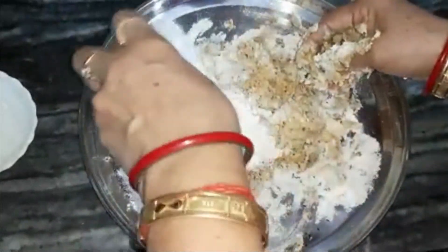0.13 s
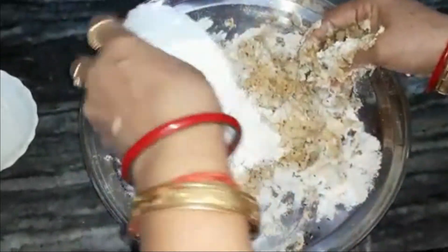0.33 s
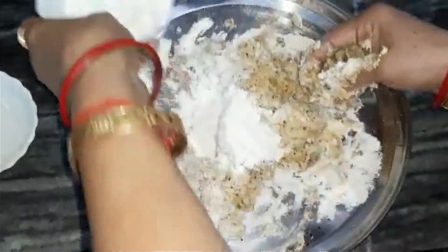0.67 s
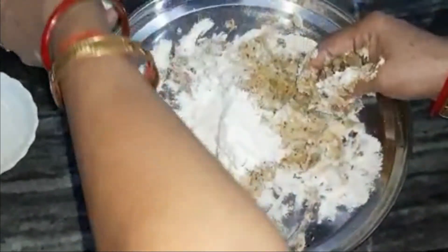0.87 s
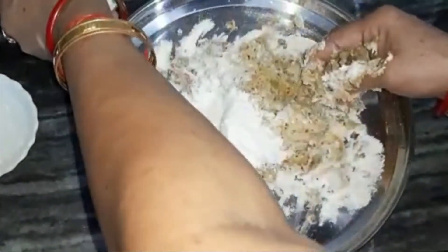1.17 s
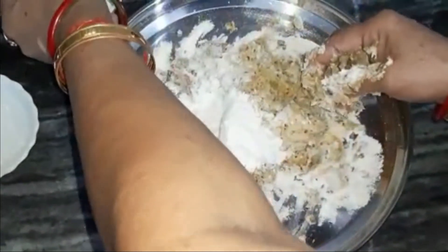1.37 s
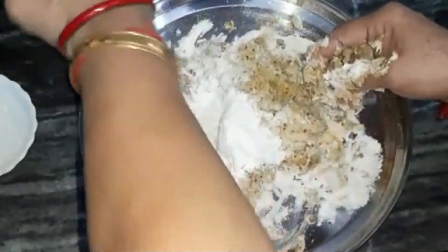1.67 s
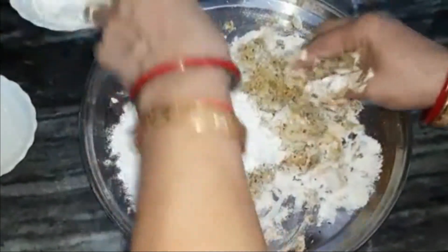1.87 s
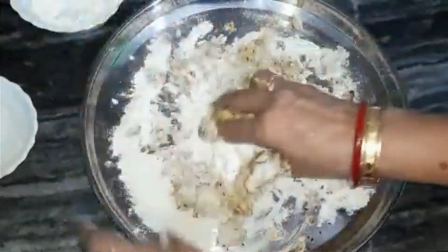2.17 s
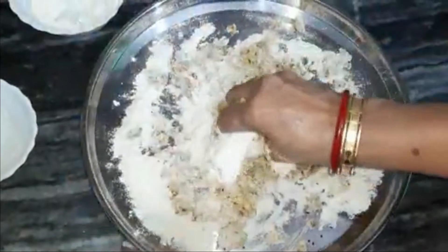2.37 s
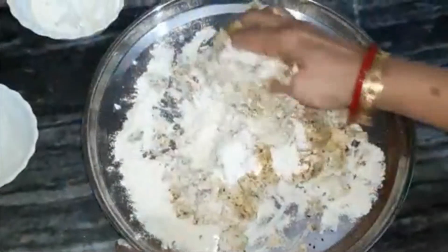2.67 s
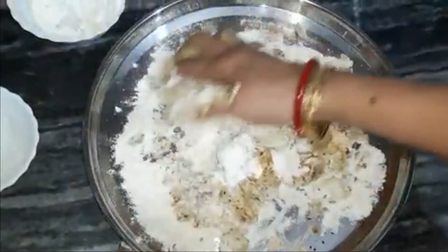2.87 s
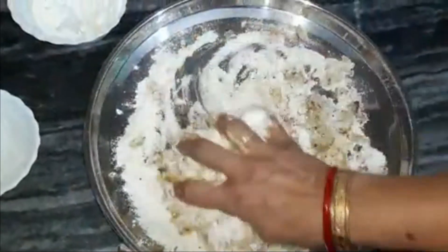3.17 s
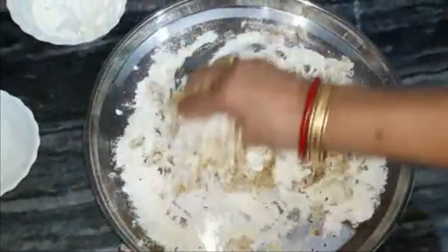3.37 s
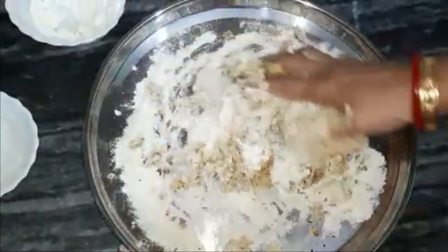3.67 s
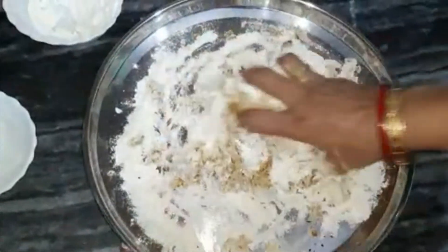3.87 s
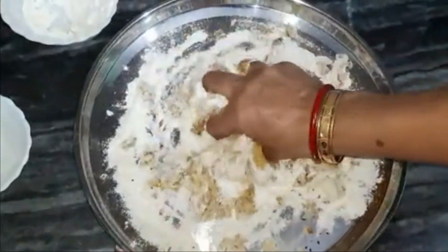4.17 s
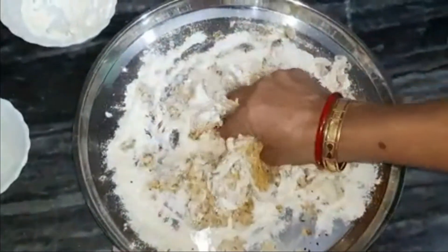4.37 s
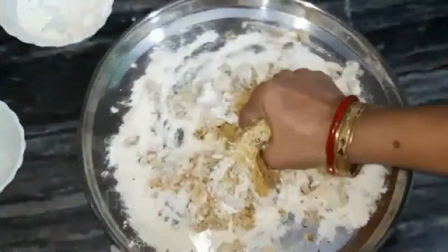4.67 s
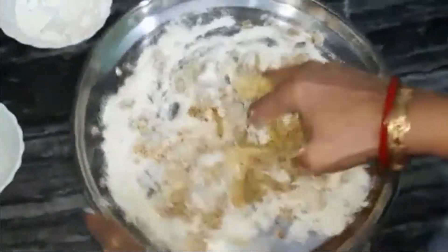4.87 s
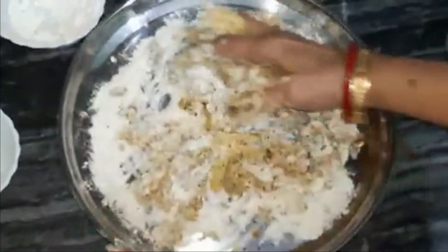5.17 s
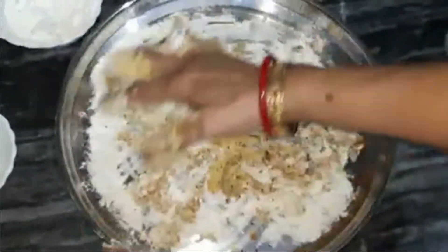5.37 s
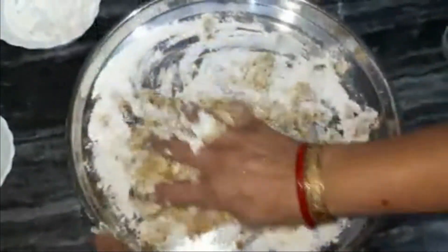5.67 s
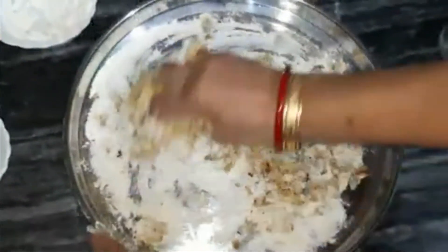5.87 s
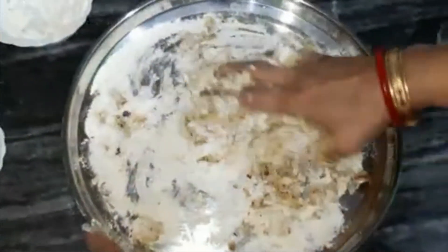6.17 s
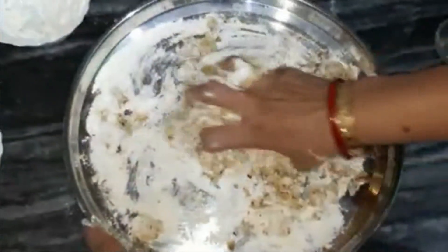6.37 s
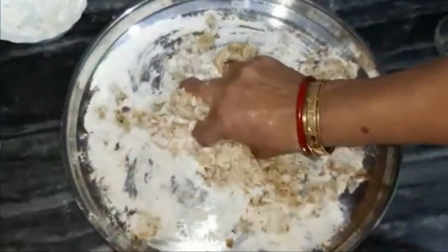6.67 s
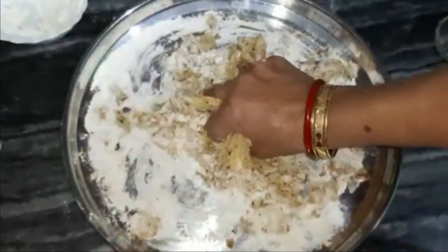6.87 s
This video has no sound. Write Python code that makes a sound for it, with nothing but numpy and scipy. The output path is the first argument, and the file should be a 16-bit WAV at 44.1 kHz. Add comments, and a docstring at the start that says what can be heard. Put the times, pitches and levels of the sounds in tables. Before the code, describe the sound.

A soft, low house rumble runs throughout in a hard-walled kitchen, heard from close by. An arm brushes faintly past in the first second. At about 1.2 seconds a small dish knocks onto the counter and settles with a duller bump at 1.5. Bangles clink brightly around 1.8 and 2.1 seconds. From 2 seconds a hand stirs paste into dry flour in a glass bowl: uneven powdery hisses, fine crumbly crackles, and fingers rubbing and briefly skidding on glass. From about 4 seconds low, soft squashing joins in, with a sticky smack at 4.2. Bangles jingle just before the loudest moment, at 4.9 seconds, when the bowl is struck hard, rings briefly and rocks against the counter. The mixing continues, with bangle clinks near 5.3, 6 and 6.7 seconds and short sticky snaps between 6.6 and 7 seconds.

```python
"""A hand works spiced paste into dry flour in a wide glass bowl, close to a phone's two microphone ports
in a hard-walled kitchen. Powder hisses and crumbs crackle with each stroke, the fingers rub and skid
on the glass, and sticky paste snaps off it. Bangles clink on the wrist, a small dish is set down before
the stirring, and once the bowl is struck hard, rings and rocks. The house rumbles softly underneath."""
import sys
import numpy as np
from scipy import signal
from scipy.io import wavfile
from scipy.ndimage import uniform_filter1d

SR = 44100
rng = np.random.default_rng(int(sys.argv[2]) if len(sys.argv) > 2 else 0)


def log_audio(samples):
    """Write samples as a 16-bit WAV file to the path given in sys.argv[1]."""
    # one column per channel
    frames = np.atleast_2d(samples).T
    # limit to full scale, then quantise
    limited = np.clip(frames, -1, 1)
    pcm = np.round(limited * 32767).astype(np.int16)
    wavfile.write(sys.argv[1], SR, pcm)


N = 309435

# ringing modes of two bangles: f/Hz, level/dB, t60/s
WIDE_BANGLE = [(6740, -8, .25), (8786, -8, .15), (8960, -1, .17), (9060, -1, .22), (9430, -7, .19),
               (9841, -1, .19), (10560, -4, .17), (12720, -4, .1), (13800, -9, .15), (15420, -10, .12)]
THIN_BANGLE = [(5020, -12, .16), (7880, -8, .12), (8150, -2, .15), (8320, 0, .18), (9065, -9, .15),
               (9450, -5, .13), (9598, -7, .11), (9825, -2, .11), (13280, 1, .13), (15540, -3, .16)]
# spectrum of a knock on the glass bowl: f/Hz, level/dB
BOWL_CLACK = [(60, -75), (130, -11.5), (250, -12), (500, -2.5), (800, 2.5), (1100, -4), (1300, 0),
              (1950, -1.5), (2400, 2), (2800, -9), (4300, -9.5), (5200, -5), (7000, -1), (9000, -8),
              (11300, -3.5), (16000, -10.5)]


def amp(db):
    return 10 ** (np.asarray(db) / 20)


def read(points, hz):
    """A curve joined by straight lines over log frequency."""
    f, value = np.transpose(points)
    return np.interp(np.log(hz + 1), np.log(f + 1), value)


def follow(points):
    """A curve over time, at every sample."""
    return np.interp(np.arange(N) / SR, *np.transpose(points))


def evened(pair):
    """Scales a stereo pair so that its middle has rms 1."""
    return pair / np.sqrt(np.mean(pair.mean(0) ** 2) + 1e-20)


def unit(pair):
    """Scales a stereo response to energy 1 a side."""
    return pair / np.sqrt(np.sum(pair ** 2, -1, keepdims=True) + 1e-20)


def colour(x, spectrum, size=4096):
    """Causal filter with the given spectrum."""
    log_gain = np.log(amp(read(spectrum, abs(np.fft.fftfreq(size, 1 / SR)))))
    taps = np.fft.ifft(np.exp(np.conj(signal.hilbert(log_gain)))).real[:size // 2]
    return signal.oaconvolve(x, taps[None], axes=1)[:, :x.shape[1]]


def in_kitchen(x, wet_db, count=26000):
    """Direct sound plus dense reflections off hard walls, the top treble dying first."""
    # reverberation time: f/Hz, t60/s
    decay_times = [(100, 0.39), (300, 0.56), (1000, 0.39), (2500, 0.39), (5000, 0.41), (8000, 0.38),
                   (15000, 0.17)]
    hz, t, noise = signal.stft(rng.standard_normal((2, count)), SR, nperseg=256)
    decay = 1000 ** (-t / read(decay_times, hz)[:, None])
    tail = signal.istft(noise * decay, SR, nperseg=256)[1][:, :count]
    build_up = 1 - np.exp(-np.arange(count) / SR / 0.0051)
    return x + amp(wet_db) * signal.fftconvolve(x, unit(tail * build_up), axes=1)[:, :x.shape[1]]


def room_tone():
    """The low drone of the house in the room's resonances, and a faint hiss."""
    # spectra of drone and hiss: f/Hz, level/dB
    drone_spectrum = [(20, -55.5), (36, -7.5), (48, -12.5), (63, -2.5), (78, 3), (125, 5), (155, -1.5),
                      (192, -18), (235, -5), (320, -10), (450, -23), (700, -34), (1500, -50)]
    hiss_spectrum = [(200, -6), (650, 0), (1200, -5), (2100, -6), (2600, -10), (3300, -18), (6000, -22),
                     (10000, -21), (13000, -17), (16000, -16)]
    # strength of the drone: t/s, relative level/dB
    drone_levels = [(0.0, -61.5), (0.9, -58.5), (0.96, -66), (1.47, -58), (2.21, -61.5), (4.69, -61.5),
                    (4.9, -57.5), (5.86, -61.5), (6.82, -56.5), (7.02, -59.5)]
    drone = evened(colour(rng.standard_normal((2, N)), drone_spectrum, size=16384))
    hiss = evened(colour(rng.standard_normal((2, N)), hiss_spectrum))
    return amp(follow(drone_levels) + 1) * drone + amp(-81) * hiss


def gesture(start, length, rise_s, release_db_per_s=162.5):
    """Envelope of one move: it gathers speed, then dies away once the push ends."""
    t = np.arange(N) / SR - start
    rise = np.sin(np.pi / 2 * np.clip(t / rise_s, 0, 1)) ** 2
    return rise * amp(-release_db_per_s * np.maximum(t - length, 0))


def friction(spectrum, slips_per_s, spread_db, smooth, clump_db):
    """Countless tiny slips of uneven size over a smooth sliding hiss; they bunch as the grip changes."""
    sizes = amp(spread_db * np.minimum(rng.exponential(1, N), 4))
    slipping = rng.random(N) < slips_per_s / SR
    slips = evened(sizes * slipping * rng.standard_normal((2, N)))
    hiss = smooth * rng.standard_normal((2, N))
    grip = uniform_filter1d(uniform_filter1d(rng.standard_normal(N), size=700), size=300)
    bunched = (slips + hiss) * amp(clump_db * grip / grip.std())
    return evened(in_kitchen(colour(bunched, spectrum), wet_db=2.5))


def cupped(x, depth_db):
    """The gap under the hand keeps changing shape, so narrow resonances come and go."""
    bands = signal.stft(x, SR, nperseg=1024, noverlap=768)[2]
    peaks = rng.standard_normal(bands.shape[1:])
    for _ in range(2):
        peaks = uniform_filter1d(uniform_filter1d(peaks, size=4, axis=0), size=11, axis=1)
    bands *= amp(depth_db * peaks / peaks.std())
    return evened(signal.istft(bands, SR, nperseg=1024, noverlap=768)[1][:, :N])


def stroke_strengths():
    """Each stroke drives hiss, rub and drag with one envelope; overlapping strokes add in power."""
    # the other arm brushes past with the dish, then the hand stirs:
    # start/s, rise/s, length/s, relative hiss level/dB, rub offset/dB, drag offset/dB
    brushes = [(.36, 0.042, 0.15, -88, 4.5, 11), (.68, 0.025, 0.089, -100, 16.5, 21),
               (1.775, 0.033, 0.032, -70.5, -19, -22)]
    stirs = [(2.101, 0.32, 0.23, -64, -5.5, -12), (2.37, 0.048, 0.054, -74, -1, -1),
             (2.52, 0.045, 0.071, -76, -13, -23), (2.71, 0.23, 0.2, -53.5, -1.5, -35),
             (2.935, 0.031, 0.076, -56, 2, -12), (3.143, 0.11, 0.15, -51.5, -1.5, -19),
             (3.354, 0.045, 0.047, -56, -5.5, -9), (3.447, .05, 0.082, -69.5, 0.5, -9),
             (3.58, 0.12, 0.48, -68, 0.5, -20), (3.733, 0.048, 0.055, -67, 1, 3),
             (3.801, 0.15, 0.24, -61.5, 2, -7), (4.064, 0.066, 0.17, -65, 1, -18),
             (4.216, 0.074, 0.17, -68.5, -1, -10), (4.576, 0.11, 0.18, -55, 4, 0),
             (4.67, 0.076, 0.07, -53.5, 3, 11.5), (4.758, 0.041, 0.3, -51, -2, -3.5),
             (5.133, 0.045, 0.64, -58, -1, -15), (5.335, 0.089, 0.17, -51.5, 3, 5),
             (5.642, 0.068, 0.12, -52.5, -0.5, -13), (5.76, 0.039, 0.067, -59, -4, -9.5),
             (5.854, 0.048, 0.096, -66, -2, -3.5), (5.954, 0.074, 0.12, -57, 1.5, -14),
             (6.079, 0.057, 0.15, -64.5, 1.5, 0.5), (6.232, 0.16, 0.19, -64, 9, 4),
             (6.387, 0.045, 0.069, -65.5, 13, 9.5), (6.51, 0.048, 0.51, -66, -11, -9.5)]
    power = np.zeros((3, N))
    for start, rise, length, hiss_db, rub_db, drag_db in brushes + stirs:
        strengths = amp(hiss_db + np.array([[0], [rub_db], [drag_db]]))
        power += (strengths * gesture(start, length, rise)) ** 2
    return np.sqrt(power)


def hand():
    """Flour hisses between fingers that rub and drag on the glass; crumbs shift under the hollow hand."""
    # spectra of the four kinds of friction: f/Hz, level/dB
    powder_spectrum = [(1500, -10.5), (2800, -4.5), (3500, -8), (5000, -6.5), (6500, -5.5), (8500, -2.5),
                       (10000, -6.5), (13000, 0), (16000, -7)]
    rub_spectrum = [(600, -30.5), (820, -47.5), (950, -4), (1250, -3), (1600, -1.5), (2200, -2),
                    (2600, -4.5), (3100, -16), (4500, -20.5)]
    drag_spectrum = [(300, -18), (550, -28), (680, -8.5), (850, -1), (1000, -2), (1400, -34)]
    crumb_spectrum = [(1000, -18), (1650, -4), (2080, 3.5), (2450, -0.5), (2900, -40), (5000, -38)]
    # the fingers never quite rest, and stir more flour as the paste spreads: t/s, level/dB
    crumb_levels = [(2.0, -100), (2.25, -77.5), (2.7, -83), (3.5, -73.5), (7.0, -74)]
    hissing, rubbing, dragging = stroke_strengths()
    resting = amp(follow(crumb_levels))
    powder = friction(powder_spectrum, slips_per_s=1700, spread_db=2.5, smooth=0.98, clump_db=3)
    powder *= np.hypot(amp(-2.5) * hissing, resting)
    rub = friction(rub_spectrum, slips_per_s=500, spread_db=3.5, smooth=0.6, clump_db=1.3)
    rub = amp(-0.1) * rubbing * cupped(rub, depth_db=2.8)
    drag = friction(drag_spectrum, slips_per_s=660, spread_db=0.5, smooth=0.96, clump_db=1.8)
    drag = amp(-6) * dragging * cupped(drag, depth_db=3.5)
    crumbs = resting * friction(crumb_spectrum, slips_per_s=300, spread_db=3, smooth=0.4, clump_db=1.5)
    return powder + rub + drag + crumbs


def ringing(modes, t, vary_db, split=0.005, free_s=0.18, touch_db_per_s=250):
    """Partials beat in close pairs, as nothing is quite round; they ring freely until touch damps them."""
    port_phases = np.array([[0], [np.pi / 2]])  # the two ports hear each a quarter cycle apart
    ring = 0
    for hz, db, t60 in modes:
        phase, twin_phase, twin_offset = rng.random(3)
        lag = port_phases * rng.choice([-1, 1])
        twin_hz = hz * (1 + split * (0.5 + twin_offset) * rng.choice([-1, 1]))
        partial = np.sin(2 * np.pi * (hz * t + phase) + lag)
        twin = 0.5 * np.sin(2 * np.pi * (twin_hz * t + twin_phase) + lag)
        strength = amp(db + vary_db * rng.standard_normal())  # the point of contact sets the mix
        ring += strength * 1000 ** (-t / t60) * (partial + twin)
    damping = amp(-touch_db_per_s * np.maximum(t - free_s, 0))
    return unit(in_kitchen(unit(ring * damping), wet_db=-15))


def strikes(hits, spectrum, crack_s, wet_db, modes=(), ring_db=0, vary_db=0, count=26000):
    """Short cracks of dense resonances plus any clear modes; each has its own loudness and brightness."""
    t, out = np.arange(count) / SR, np.zeros((2, N))
    for start, level_db, cutoff_hz in hits:
        burst = rng.standard_normal((2, count)) * np.exp(-t / crack_s)
        sound = in_kitchen(unit(colour(burst, spectrum)), wet_db)
        if len(modes):
            sound += amp(ring_db) * ringing(modes, t, vary_db)
        dulled = signal.lfilter(*signal.butter(5, cutoff_hz, fs=SR), sound)
        at = round(start * SR)
        out[:, at:at + count] += amp(level_db) * dulled[:, :N - at]
    return out


def bangles():
    """Metal hoops knock together and ring high, first on one arm, then on the other."""
    # on the arm that fetches the dish: t/s, relative level/dB, cutoff/Hz, which bangle
    clinks = [(0.443, -59, 15900, WIDE_BANGLE), (.472, -58, 12200, THIN_BANGLE),
              (1.528, -53, 8800, THIN_BANGLE), (1.8157, -31.5, 15700, WIDE_BANGLE),
              (2.0826, -33, 16100, THIN_BANGLE)]
    # on the stirring wrist: t/s, relative level/dB, cutoff/Hz
    jingles = [(4.527, -44, 9000), (4.791, -30, 16300), (4.895, -25.5, 16000), (5.286, -34, 16000),
               (5.902, -52, 16000), (5.956, -37, 16400), (6.66, -42, 8000), (6.668, -31.5, 14000),
               (6.677, -30, 16200), (6.691, -32.5, 15100)]
    # their ring: f/Hz, level/dB, t60/s
    wrist_modes = [(4020, -18, .35), (4610, -9, .22), (5184, -5, .24), (5733, -3, .2), (6250, -3, .16),
                   (6729, -5, .25), (7610, 0, .14), (8380, 0, .12), (11390, -4, .15), (12200, -4, .12),
                   (12880, -3, .1)]
    metal = [(1000, -60.5), (2000, 0), (3500, -14), (5000, 0), (9000, 6.5), (16000, 4)]  # f/Hz, level/dB
    fetching = sum(strikes([hit], metal, crack_s=0.0055, wet_db=-3, modes=bangle, ring_db=3.5, vary_db=1)
                   for *hit, bangle in clinks)
    stirring = strikes(jingles, metal, crack_s=0.005, wet_db=0, modes=wrist_modes, ring_db=0.5, vary_db=2)
    return amp(5) * fetching + amp(2.5) * stirring


def dish():
    """A small dish is set down on the counter, tips onto its foot and settles."""
    # contacts: t/s, relative level/dB, cutoff/Hz
    knocks = [(1.2155, 6.5, 6600), (1.459, -2, 775), (1.4652, -8, 1960), (1.4675, 1, 684),
              (1.4775, -8, 680)]
    # spectrum of a knock: f/Hz, level/dB
    spectrum = [(60, -57), (117, 5), (180, -24.5), (225, -1.5), (360, -1.5), (470, -4.5), (620, -1.5),
                (1000, -3.5), (1350, 3), (1750, 2), (2550, -2), (3200, -14.5), (4000, -19.5), (4800, -18.5),
                (6000, -39.5), (9000, -30), (14000, -29)]
    # the dish's ring: f/Hz, level/dB, t60/s
    modes = [(365, -7, .3), (511, -3, .28), (624, -3, .22), (856, -11, .22), (1330, -7, .22),
             (1475, -1, .2), (1685, 1, .16), (1809, -1, .17), (1916, -4, .25), (2245, -3, .23)]
    return amp(-5.5) * strikes(knocks, spectrum, crack_s=0.006, wet_db=-2.8, modes=modes, ring_db=-4)


def palm():
    """The palm slowly squashes the dough with a low rub."""
    # pushes: start/s, length/s, relative level/dB
    presses = [(3.92, 0.21, -64), (4.64, 0.46, -52), (5.1, 0.16, -63), (5.44, 0.32, -70), (6.09, 0.22, -60),
               (6.28, 0.2, -51), (6.53, 0.22, -63)]
    # spectrum of the yielding dough: f/Hz, level/dB
    spectrum = [(100, -12), (200, -27.5), (270, -1.5), (340, -6), (430, -17.5), (600, -18), (1000, -37.5)]
    power = sum((amp(db) * gesture(start, length, rise_s=0.094, release_db_per_s=145)) ** 2
                for start, length, db in presses)
    dough = friction(spectrum, slips_per_s=140, spread_db=2, smooth=0.36, clump_db=-1.8)
    return amp(-1.5) * np.sqrt(power) * dough


def fingertip(width_hz=78):
    """A fingertip skids over bare glass: slips ring one narrow resonance whose pitch slides."""
    # skids: start/s, length/s, level/dB, first f/Hz, last f/Hz
    skids = [(3.957, 0.061, -67.5, 989, 882), (4.693, .04, -50, 965, 840), (5.386, 0.0893, -57, 794.5, 918),
             (6.147, 0.054, -59.5, 980, 917)]
    out, pole = np.zeros((2, N)), np.exp(-np.pi * width_hz / SR)
    for start, length, level_db, from_hz, to_hz in skids:
        hz = follow([(start, from_hz), (start + length, to_hz)])
        slips = rng.standard_normal((2, N)) + 1j * rng.standard_normal((2, N))
        narrow = signal.lfilter([1], [1, -2 * pole, pole * pole], slips)
        pitched = (narrow * np.exp(2j * np.pi * np.cumsum(hz) / SR)).real
        out += amp(level_db) * gesture(start, length, rise_s=0.048) * evened(pitched)
    return out


def paste():
    """Sticky paste snaps off the glass in short smacks."""
    # snaps: t/s, level/dB, cutoff/Hz
    smacks = [(4.1865, -37, 14000), (6.617, -41.5, 16000), (6.9225, -34, 9100), (6.9918, -24.5, 15000)]
    # spectrum of a snap: f/Hz, level/dB
    spectrum = [(1000, -43), (1600, -6), (2050, 6), (2700, -9), (3500, -18), (5000, -20), (7500, 3),
                (9500, -10), (12000, -4), (16000, -9.5)]
    return strikes(smacks, spectrum, crack_s=0.0041, wet_db=-7)


def bowl_struck():
    """One hard blow on the rim sets the glass bowl ringing."""
    # the blow: t/s, relative level/dB, cutoff/Hz
    blows = [(4.9325, 7, 16300)]
    # the bowl's ring: f/Hz, level/dB, t60/s
    modes = [(324, -12, .42), (467, -17, .5), (802, 1.5, .3), (854, -4, .3), (1259, -8, .45),
             (1384, -7, .38), (1421, -6, .34), (1751, -7, .34), (1794, -6, .34), (1910, -4, .3),
             (2262, -9, .33), (2325, 0, .24), (2349, 3, .28), (2877, -5.5, .38), (3322, -0.5, .32),
             (3455, -3, .28), (3530, -11, .2), (4022, 2.5, .35), (4608, -7, .33), (5153, -3, .32),
             (5728, -3, .28), (6234, -2.5, .26), (6295, -7, .27), (6710, -2, .24), (6762, -4, .3),
             (7176, -7, .32), (7564, -9, .27), (7790, -7, .25), (8030, -13, .3), (11300, -9, .15),
             (12950, -17, .2), (13950, -17, .2)]
    return amp(2) * strikes(blows, BOWL_CLACK, crack_s=0.0074, wet_db=-4.5, modes=modes, ring_db=2.5)


def bowl_rocking():
    """The bowl rocks, and its foot bumps the counter without ringing."""
    # contacts: t/s, level/dB, cutoff/Hz
    bumps = [(4.9355, 12, 2880), (4.987, 6, 2060), (5.178, -16, 2210), (5.1905, -21, 1500)]
    return strikes(bumps, BOWL_CLACK, crack_s=0.0077, wet_db=-3.5)


def scene():
    """The work at the counter, heard from close by over the kitchen's room tone."""
    return (room_tone() + hand() + bangles() + dish() + palm() + fingertip() + paste()
            + bowl_struck() + bowl_rocking())


def record(dry, band_limit_hz=15950):
    """The phone's two close ports share the bass; each has its own resonances; the top is cut off."""
    # stereo width: f/Hz, side over mid/dB
    width = [(30, -7), (100, -16), (300, -11), (550, -2), (850, -7), (1300, -1.5), (2000, -1), (4000, 0),
             (16000, 0)]
    # balance of the ports: f/Hz, left over right/dB
    balance = [(100, -1.5), (700, -0.5), (1100, -2), (1600, -6), (2100, -11), (2450, -8.5), (2900, -1.5),
               (3700, 0.5), (5400, -2), (6800, -5.5), (8300, 1.5), (11000, -2), (14500, 2)]
    mid, side = dry.mean(0), colour((dry[:1] - dry[1:]) / 2, width)
    # the two responses keep their summed power level
    right_port = [(hz, -10 * np.log10((1 + amp(db) ** 2) / 2)) for hz, db in balance]
    left_port = [(hz, db + right_db) for (hz, db), (_, right_db) in zip(balance, right_port)]
    ports = np.vstack([colour(mid + side, left_port), colour(mid - side, right_port)])
    lowpass = signal.firwin(401, band_limit_hz, window=("kaiser", 8), fs=SR)
    return signal.oaconvolve(ports, lowpass[None], "same")


dry = scene()
out = record(dry)
log_audio(out)
```